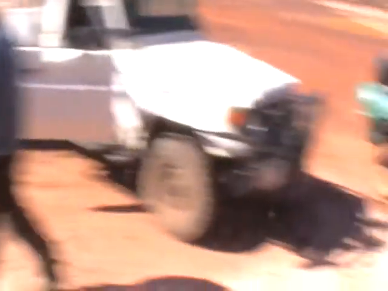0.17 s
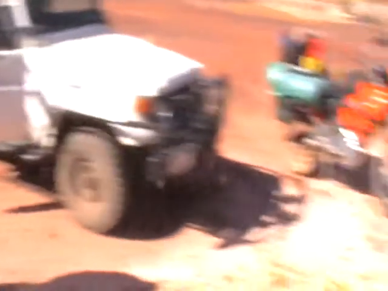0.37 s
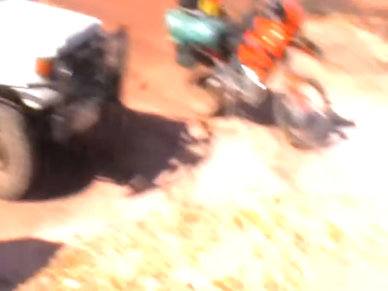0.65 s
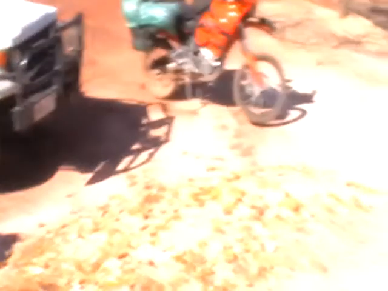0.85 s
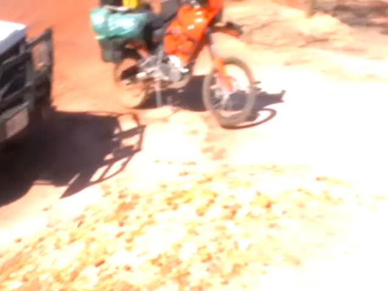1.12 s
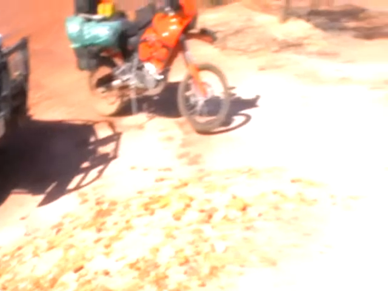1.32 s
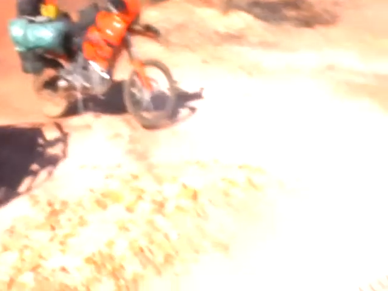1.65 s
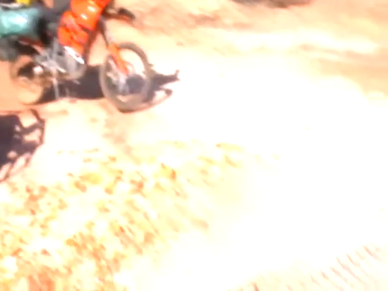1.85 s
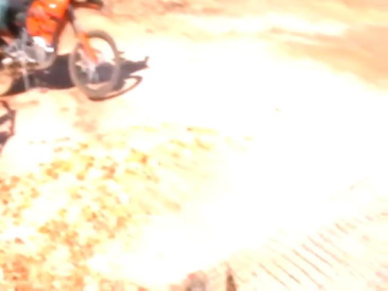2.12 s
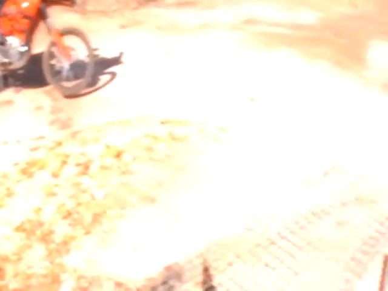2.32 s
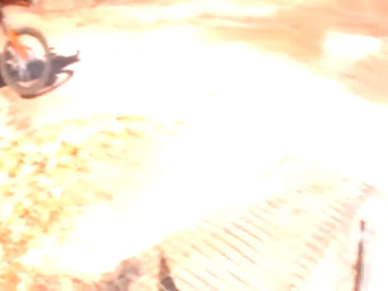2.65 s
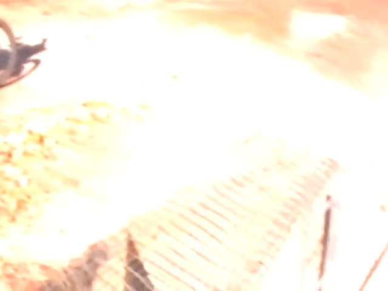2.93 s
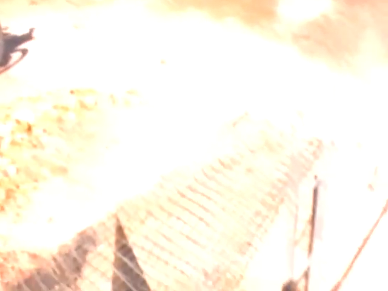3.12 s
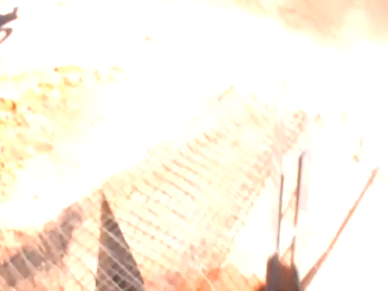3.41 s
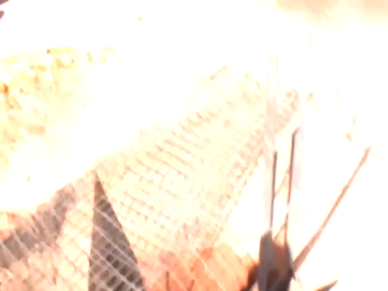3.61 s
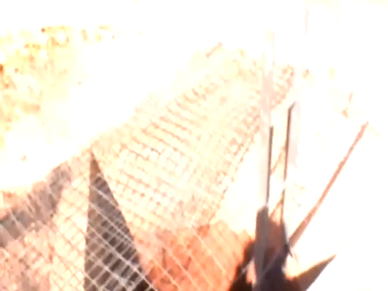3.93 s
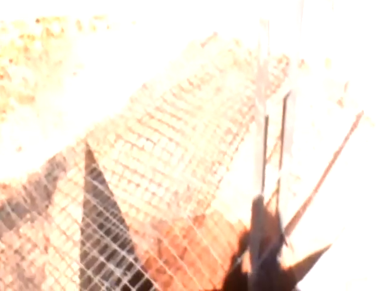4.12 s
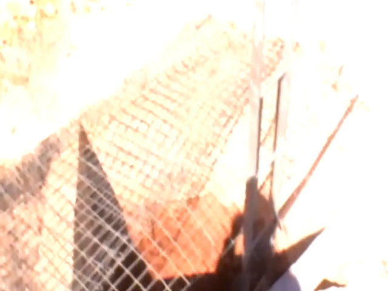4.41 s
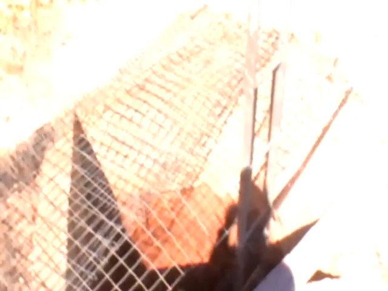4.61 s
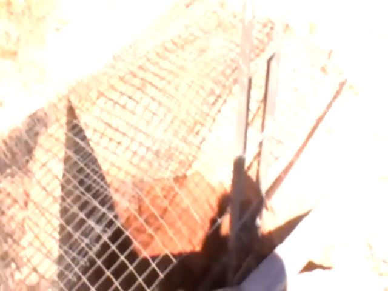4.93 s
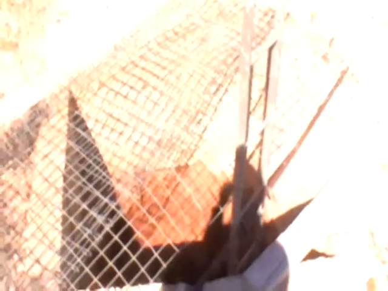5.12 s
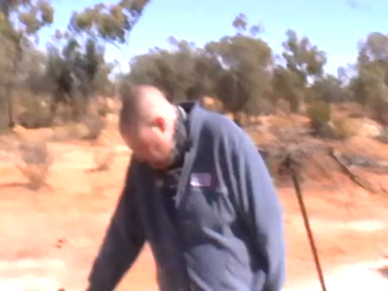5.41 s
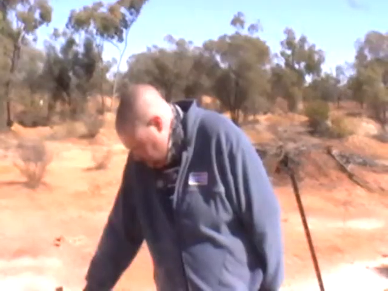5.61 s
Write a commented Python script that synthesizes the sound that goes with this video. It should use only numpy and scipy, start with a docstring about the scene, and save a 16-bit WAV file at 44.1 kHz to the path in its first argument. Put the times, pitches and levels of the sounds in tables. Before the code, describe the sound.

Quiet gritty shuffling and bumps, a clattering failed engine pull, then a second pull that fires into rapid chugging, a brief dropout and a louder run.

```python
"""In a yard outdoors, a small one-cylinder petrol engine is pulled over once and dies, then catches and chugs.
Valve gas is shaped noise, muffler puffs are short low waves; clatter and drone are noise, with a late whine.
Knocks are noise bursts that ring the frame as fading sines, and small steel parts ring higher. Before it, feet
shuffle (gritty noise) and small things tick; soft low bumps come now and then throughout, and a low rumble lies
under it all. Near the end everything falls silent for about a quarter second."""
import sys
import numpy as np
from scipy import signal
from scipy.fft import rfft, irfft, next_fast_len
from scipy.io import wavfile
from scipy.ndimage import uniform_filter1d, map_coordinates

SR = 44100
rng = np.random.default_rng(int(sys.argv[2]) if len(sys.argv) > 2 else 0)


def generate_wav(sig):
    """Save sig (samples, or channels by samples) to the path in sys.argv[1] as 16-bit PCM at SR."""
    pcm = np.round(np.clip(np.atleast_2d(sig).T, -1, 1) * 32767).astype(np.int16)
    wavfile.write(sys.argv[1], SR, pcm)


N = 253575
SIZE = next_fast_len(N + 8192)  # room for filters to ring out
HZ = np.fft.rfftfreq(SIZE, 1 / SR)

# turning of the engine shaft while it chugs: [t/s, turns done]
SHAFT = [(4.071, 0), (4.132, 1), (4.187, 2), (4.291, 4), (4.389, 6), (4.594, 10), (5.007, 18), (5.111, 20),
         (5.218, 22), (5.329, 24), (5.388, 25)]
# tone colour of the knocked frame: [f/Hz, level/dB per Hz]
FRAME_COLOUR = [(260, -23.5), (450, 1.5), (980, -5), (1670, -5), (2100, -15), (3280, -15.5), (5000, -16),
                (8500, -26.5), (16000, -56)]
# tone colour of the muffler drone and of the thud under a knock: [f/Hz, level/dB per Hz]
DRONE_COLOUR = [(120, -47.5), (190, -8.5), (240, 7), (300, 6.5), (410, 2), (520, -8.5), (800, -35)]
# ways the frame rings: [f/Hz, width/Hz, level/dB]
FRAME_MODES = [(240.3, 12, -2.5), (418, 50, -1), (585, 22, -4), (708, 13, -3), (812, 7.4, -3.5),
               (1189.5, 18, -3.5), (1263, 12, -5), (1567, 33, -10), (1699, 50, -7), (2210, 11, -14.5),
               (2727, 41, -10)]


def amp(db):
    """Turns dB into a gain."""
    return 10 ** (np.asarray(db) / 20)


def along(points):
    """Joins (Hz, value) points into a curve on a log frequency axis."""
    hz, value = np.transpose(points)
    return np.interp(np.log(HZ + 1), np.log(hz + 1), value)


def curves(rows):
    """Gives one value per sample for each column after the time."""
    s, *columns = np.transpose(rows)
    return [np.interp(np.arange(N) / SR, s, column) for column in columns]


def wobble(rate):
    """Draws a smooth random curve with this many knots a second."""
    knots = rng.standard_normal(int(N * rate / SR) + 4)
    return map_coordinates(knots, [np.arange(N) * rate / SR])


def filtered(x, response):
    """Multiplies the spectrum of x by a complex response."""
    return irfft(rfft(x, SIZE) * response, SIZE)[..., :N]


def colour(db):
    """Makes a filter of this dB shape that never rings ahead; white noise of rms 1 leaves at rms 1."""
    cepstrum = irfft(np.maximum(db, -120) * np.log(10) / 20, SIZE)
    # folding the second half onto the first gives minimum phase
    cepstrum[1:SIZE // 2] *= 2
    cepstrum[SIZE // 2 + 1:] = 0
    return np.exp(rfft(cepstrum)) / np.sqrt(np.mean(amp(db) ** 2))


def noise(envelope, db):
    """Makes two unrelated noises with one envelope and one colour."""
    return filtered(envelope * rng.standard_normal((2, N)), colour(db))


def add(track, s, piece):
    """Adds a short piece into a track at a time in seconds."""
    k = round(s * SR)
    track[k:k + len(piece)] += piece[:N - k]


def stereo(pair, alike):
    """Mixes two unrelated signals to left and right; where these are alike, the first signal rules."""
    angle = np.arccos(np.clip(along(alike), -1, 1)) / 2
    mid, side = filtered(pair, np.array([np.cos(angle), np.sin(angle)]))
    return np.array([mid + side, mid - side])


def push(hz, cycles, wave=np.cos):
    """A soft push of air: a few cycles under a smooth hump."""
    t = np.arange(int(cycles / hz * SR)) / SR
    hump = np.sin(np.pi * t * hz / cycles) ** 2
    return hump * wave(np.pi * cycles - 2 * np.pi * hz * t)


def lift(peaks):
    """Lift in dB from (Hz, width in Hz, dB) resonances."""
    return sum(db / (1 + (2 * (HZ - hz) / width) ** 2) for hz, width, db in peaks)


def patchy(pair, depth_db, size):
    """Resonances come and go: random gains over time and frequency, with mean squared gain 1."""
    spectrum = signal.stft(pair, nperseg=256)[2]
    field = rng.standard_normal(spectrum.shape[1:])
    field = uniform_filter1d(field, size=size[0], axis=0)
    field = uniform_filter1d(field, size=size[1], axis=1)
    gain = amp(depth_db * field / field.std())
    return signal.istft(spectrum * gain / np.sqrt(np.mean(gain ** 2)), nperseg=256)[1][:, :N]


def turning():
    """While the shaft turns, the casing clatters, loose parts tap the frame, and the muffler drones and rumbles."""
    # three runs (pulled over, chugging, full speed), each: [t/s, casing clatter/dB, muffler drone/dB]
    runs = [
        [(2.05, -64, -71), (2.13, -52.5, -54), (2.28, -66, -49), (2.34, -46, -51), (2.46, -41.5, -41.5),
         (2.57, -40.5, -43), (2.65, -45, -47), (2.78, -45, -53.5), (3.1, -61, -62.5)],
        [(3.47, -61, -65), (3.51, -47.5, -49), (3.58, -49, -41.5), (3.65, -44, -43.5), (3.9, -40, -35.5),
         (4.04, -37.5, -35), (4.2, -36.5, -31.5), (4.37, -35, -38.5), (4.47, -38, -36), (4.6, -37.5, -39.5),
         (5.4, -38.5, -38.5)],
        [(5.62, -35, -36), (5.75, -35.5, -34)],
    ]
    # clatter colour while chugging: [f/Hz, level/dB per Hz]
    chug_colour = [(260, -32), (480, -3), (782, -14.5), (922, -3.5), (1040, -14), (1240, -9), (1600, -10),
                   (2070, -16), (2260, -13), (2790, -13), (3230, -18.5), (6000, -29.5), (8540, -48),
                   (16000, -55)]
    # clatter colour at full speed: [f/Hz, level/dB per Hz]
    racing_colour = [(260, -29.5), (450, 1), (1100, -9), (1260, -7.5), (1730, -12), (2290, -6), (2620, -13),
                     (2830, -9), (3280, -17.5), (11700, -34), (16000, -43)]
    # colour of the low muffler rumble: [f/Hz, level/dB per Hz]
    throb_colour = [(30, -30), (55, 7), (85, 8), (190, 13), (260, -25)]
    # low rumble against the clatter, one value per run: [level/dB]
    throb_levels = [-24, -7, 1]
    # how unevenly the casing rattles, one value per run: [spread/dB]
    rattle_spreads = [2, 2, .8]
    loose_per_s, loose_db = 140, 36.5  # taps of loose parts; level against the clatter
    patch_db = 1.8  # how far the colour shifts from moment to moment

    total, taps = np.zeros((2, N)), np.zeros(N)
    hits = (rng.random(N) < loose_per_s / SR) * rng.standard_normal(N)
    loose = uniform_filter1d(hits, size=5)
    timbres = along(FRAME_COLOUR), along(chug_colour), along(racing_colour)
    for run, timbre, throb_db, spread_db in zip(runs, timbres, throb_levels, rattle_spreads):
        start, end = (run[0][0] - .03, -90, -90), (run[-1][0] + .04, -90, -90)
        clatter_db, drone_db = curves([start] + list(run) + [end])
        rattle_db = spread_db * (wobble(40) + wobble(300))
        total += noise(amp(clatter_db + rattle_db), timbre + casing())
        taps += amp(clatter_db + loose_db) * loose
        total += noise(amp(drone_db + 3.3 * wobble(60)), along(DRONE_COLOUR))
        total += noise(amp(clatter_db + throb_db + 4.5 * wobble(16)), along(throb_colour))
    total[0] += filtered(taps, frame_modes())
    total = patchy(total, patch_db, size=(2, 10))
    total[0] += whine()
    return total


def whine():
    """At full speed a thin tone wavers in level and phase."""
    whine_hz, whine_db, from_s = 2782, -39, 5.5
    t = np.arange(N) / SR
    level = amp(whine_db + 4 * wobble(70))
    return (t > from_s) * level * np.sin(2 * np.pi * whine_hz * t + wobble(70))


def casing():
    """The engine casing resonates and lifts some pitches, in dB."""
    # resonances of the casing: [f/Hz, width/Hz, lift/dB]
    resonances = [(705, 23, 5.5), (815, 25, 5), (1234, 71, 6), (1850, 40, 4.5), (2050, 110, -3),
                  (2235, 70, 3), (2760, 120, 4), (3980, 120, 5), (4350, 440, 2.5)]
    return lift(resonances)


def exhaust():
    """Gas blows when the valve opens, holds, then thins out, the top first; the muffler thumps and puffs."""
    # uneven blows of gas: [t/s, level/dB, top treble against it/dB]
    uneven_hisses = [(2.203, -45.5, -14.5), (2.4562, -36.5, -17), (2.5751, -26, -10.5),
                     (2.664, -44.5, -12.5), (2.8872, -43.5, -21.5), (3.523, -33, -12), (3.6437, -45.5, -25),
                     (3.726, -35.5, -16.5), (3.8327, -17.5, -16.5), (3.905, -35, -40.5),
                     (3.978, -36.5, -10), (4.0002, -37.5, -20), (4.4167, -22.5, -13.5)]
    # single muffler puffs, as it catches and at full speed: [t/s, level/dB]
    single_puffs = [(3.985, -26.5), (4.014, -22.5), (4.056, -19), (5.675, -21.5), (5.712, -21.5)]
    # colour of the gas hiss: [f/Hz, level/dB per Hz]
    gas_colour = [(2000, -7), (2800, 1), (3300, -5), (4200, -5.5), (5500, -6), (6500, -8), (8000, -7.5),
                  (10500, -18.5), (16000, -35)]
    # colour of its top treble: [f/Hz, level/dB per Hz]
    top_colour = [(6000, -21), (9500, 0), (13000, 1), (15000, 0), (16000, -2)]
    # whistles of the exhaust port: [f/Hz, width/Hz, lift/dB]
    port = [(6350, 300, 4), (8550, 150, 5)]
    patch_db = 2  # how far the colour shifts from moment to moment
    hold_s = .018

    flow, top, thump = np.zeros((3, N))
    t = np.arange(SR // 6) / SR
    rise = 1 - np.exp(-t / .002)
    falling = np.maximum(t - hold_s, 0)
    hisses, puffs = chugs()
    for s, db, top_db in uneven_hisses + hisses:
        blow = amp(-60 * falling / 0.07)
        tail = amp(-14.0 - 60 * t / 0.42)
        add(flow, s - .002, rise * amp(db - 7.0) * (blow + tail))
        add(top, s - .002, rise * amp(db + top_db - 1.5 - 60 * falling / 0.068))
        add(thump, s - .003, amp(db - 2) * push(310, cycles=3))
    flutter = amp(0.33 * wobble(350))
    pair = noise(flow * flutter, along(gas_colour) + casing() + lift(port))
    pair += noise(top * flutter, along(top_colour))
    pair = patchy(pair, patch_db, size=(8, 12))
    pair[0] += thump
    for s, db in single_puffs + puffs:
        detune = 1 + .025 * rng.standard_normal()
        add(pair[0], s, amp(db) * push(365 * detune, cycles=2.98, wave=np.sin))
    return pair


def chugs():
    """Each turn gives a hiss and then a puff; a turn without a firing leaks late and weakly."""
    # strength of the firings: [t/s, hiss/dB, puff/dB]
    firing = [(4.07, -30.5, -20.5), (4.21, -35, -18.5), (4.39, -30, -14.5), (4.49, -34.5, -20),
              (4.6, -29.5, -16), (5.0, -32, -17), (5.11, -27.5, -16.5), (5.33, -29.5, -17.5)]
    caught_turns = 6  # every turn blows fully up to here, then every second one
    idle_lag_s, idle_hiss_db, idle_puff_db = 0.017, -20.5, -3.5
    puff_lag_turns, stumble_turn = .23, 7  # puff after the valve opens; one turn has almost no puff
    top_db = -10.5  # top treble against the hiss

    at, done = np.transpose(SHAFT)
    turn = np.arange(done[-1])
    hiss_s = np.interp(turn, done, at)
    puff_s = np.interp(turn + puff_lag_turns, done, at)
    idle = (turn > caught_turns) & (turn % 2 == 1)
    when, *levels = np.transpose(firing)
    hiss_db, puff_db = (np.interp(hiss_s, when, level) for level in levels)
    scatter = rng.standard_normal((len(turn), 2)).T
    hiss_db = hiss_db + idle_hiss_db * idle
    puff_db = puff_db + idle_puff_db * idle - 20 * (turn == stumble_turn) + .7 * scatter[1]
    hisses = zip(hiss_s + idle_lag_s * idle, hiss_db, top_db + 1.5 * scatter[0])
    return list(hisses), list(zip(puff_s, puff_db))


def knocks():
    """A hard blow makes a short rattle with a thud under it; the frame rings on, and steel parts ring too."""
    # knocks of starter and frame: [t/s, level/dB, low thud against it/dB, favoured frame mode f/Hz]
    blow_times = [(2.124, -33.5, -12, 812), (2.209, -33, -4, 585), (2.217, -36.5, 0, 708),
                  (2.306, -33, 2, 413), (2.316, -32.5, -7, 708), (2.387, -29, -2, 1699),
                  (2.397, -31, -12, 1567), (2.435, -30.5, -6, 1699), (2.445, -28.5, -12, 1699),
                  (2.47, -30.5, -10.5, 1699), (2.514, -23, -6, 413), (2.529, -30, -16.5, 1263),
                  (2.575, -22, -6, 1567), (2.582, -25, -9, 1190), (2.644, -36.5, 0.5, 1263),
                  (2.783, -28.5, -21, 1699), (2.798, -32.5, -11.5, 1567), (2.921, -34.5, -17, 1567),
                  (3.154, -35, -25, 1567), (3.257, -32.5, -13.5, 1699), (3.493, -34, -4.5, 812),
                  (3.525, -23, -9, 585), (3.532, -22.5, -4, 585), (3.595, -33, 0, 413),
                  (3.66, -31, -8.5, 708), (3.7, -30, -2, 413), (3.742, -28, -7.5, 1699),
                  (3.775, -31, -2, 708), (3.808, -19, -10, 1567), (3.826, -24, -2, 413),
                  (3.835, -15, -17, 2727), (3.84, -19, -24, 1699), (3.908, -31, -13, 1699),
                  (4.056, -21, -16, 1567), (4.177, -26.5, 11, 1699), (4.409, -12, -12, 413),
                  (4.413, -13, -20, 1699), (4.44, -24, -20, 1190)]
    # ringing of a steel bracket: [f/Hz, level/dB, time to fall 60 dB/s]
    bracket = [(1200, 0, .14), (6290, 3, .3), (6412, 3, .34), (11360, 5, .13)]
    # strikes on the bracket: [t/s, level/dB, dullness/dB per octave]
    clinks = [(2.588, -45, 0), (3.086, -51, 15), (3.272, -44, 15), (4.42, -27, 15)]
    # ringing of a small steel pin: [f/Hz, level/dB, time to fall 60 dB/s]
    pin = [(4470, 0, .32)]
    # strikes on the pin: [t/s, level/dB]
    pings = [(2.079, -58), (2.138, -56), (2.205, -62), (2.582, -55), (4.418, -52)]
    # tiny metal parts of the starter: [t/s, level/dB, f/Hz]
    tinks = [(2.074, -52, 8750), (2.079, -56, 10400), (2.127, -50, 4150), (2.137, -57, 9000),
             (2.208, -51, 5150), (2.209, -56, 9500)]
    tink_t60_s = .06
    knock_t60_s, longer_s_per_db = 0.049, 0.0016  # rattle of a 0 dB knock; weaker ones trail longer
    # frame ring against a knock, per Hz of mode width; lift of the favoured mode; scatter
    ring_db, favour_db, scatter_db = -41, 10, 2.5

    rattle, thud, frame_ring = np.zeros((3, N))
    t = np.arange(SR // 3) / SR
    mode_hz, width, mode_db = np.transpose(FRAME_MODES)[..., None]
    decay = np.exp(-np.pi * width * t)
    onset = 1 - np.exp(-t / .0012)
    modes = width * amp(mode_db) * decay * np.sin(2 * np.pi * mode_hz * t) * onset
    for s, db, thud_db, ring_hz in list(blow_times) + valves():
        t60 = knock_t60_s - longer_s_per_db * db
        fall = amp(db - 60 * t / t60) * (1 - np.exp(-t / 0.0024))
        add(rattle, s - .001, fall)
        add(thud, s - .001, amp(thud_db - 6.5) * fall)
        favoured = np.abs(mode_hz[:, 0] - ring_hz) < 45
        scatter = scatter_db * rng.standard_normal(len(modes))
        add(frame_ring, s, amp(db + ring_db + favour_db * favoured + scatter) @ modes)
    rattle *= amp(2.5 * wobble(180))
    pair = noise(amp(-8.5) * rattle, along(FRAME_COLOUR) + .5 * casing())
    pair += noise(thud, along(DRONE_COLOUR))
    pair += filtered(amp(6) * rattle * rng.standard_normal((2, N)), frame_modes())

    rings = []
    for s, db, dull in clinks:
        for hz, level, t60 in bracket:
            octaves = np.log2(hz / bracket[0][0])
            rings.append((s, db + level - dull * octaves, hz, t60))
    rings += [(s, db + level, hz, t60) for s, db in pings for hz, level, t60 in pin]
    rings += [(s, db, hz, tink_t60_s) for s, db, hz in tinks]
    steel = np.zeros(N)
    for s, db, hz, t60 in rings:
        tone = np.sin(2 * np.pi * (hz * t + rng.random()))
        add(steel, s, amp(db - 60 * t / t60) * tone * (1 - np.exp(-t / 0.0018)))
    pair[0] += frame_ring + steel * amp(1.3 * wobble(250))
    return pair


def valves():
    """The valve gear clacks twice a turn, unevenly in time and level."""
    in_turn, clack_db = [.05, .55], [-32, -36]  # where in a turn, and how hard
    scatter_db, thud_db = 3, -30  # thud is against the clack
    at, done = np.transpose(SHAFT)
    chance = rng.standard_normal((int(done[-1]), 2, 2))
    turn = np.arange(done[-1])[:, None] + in_turn + .05 * chance[..., 0]
    s = np.interp(turn, done, at)
    db = clack_db + scatter_db * chance[..., 1]
    return [(when, level, thud_db, 0) for when, level in zip(s.ravel(), db.ravel())]  # 0: no favoured mode


def frame_modes():
    """The frame rings as a sum of resonators with alternating sign, given as a frequency response."""
    response = 0
    for k, (hz, width, db) in enumerate(FRAME_MODES):
        damping = 1j * HZ * width
        response = response + (-1) ** k * amp(db) * damping / (hz * hz - HZ * HZ + damping)
    return response


def yard():
    """Feet grind on dry ground as gritty noise, with rustle, soft bumps, ticks and a steady low rumble."""
    # feet on dry ground: [t/s, shuffle/dB]
    shuffle = [(0, -58.5), (.3, -55.5), (.5, -56), (.7, -60), (1.05, -62), (1.28, -61.5), (1.44, -57),
               (1.58, -57.5), (1.69, -58), (1.73, -63.5), (1.85, -62.5), (1.94, -65.5), (2.0, -60.5),
               (3.05, -64), (3.44, -64.5)]
    # soles scraping: [t/s, level/dB]
    scuffs = [(.222, -54), (.4, -54), (.572, -58), (.72, -59), (1.455, -56), (1.65, -54.5), (1.68, -55),
              (1.968, -55)]
    # soft bumps: [t/s, level/dB, f/Hz]
    bumps = [(0.318, -36.5, 310), (.401, -35.5, 205), (0.427, -26, 192), (.571, -45.5, 600),
             (.823, -38.5, 375), (1.22, -46.5, 800), (1.459, -41, 850), (1.493, -34.5, 262),
             (1.511, -37, 252), (1.653, -45, 1150), (1.66, -41, 113), (1.663, -43, 1170), (1.765, -39, 152),
             (1.836, -40, 340), (1.877, -35, 124), (1.961, -39.5, 260), (2.021, -36.5, 75),
             (3.594, -28.5, 77.6), (3.66, -37, 71), (3.879, -33, 130), (4.39, -31, 70.4), (5.035, -27, 85),
             (5.667, -29, 84)]
    # dry ticks: [t/s, level/dB, treble against it/dB]
    ticks = [(0.173, -38, -23), (1.004, -48, -11), (1.148, -35, -20), (1.275, -25.5, -24),
             (1.782, -41.5, -34), (2.062, -52.5, -9), (2.1, -41, -10.5)]
    # colour of the rumble: [f/Hz, level/dB per Hz]
    rumble_colour = [(15, -51), (26, -7.5), (59, 5.5), (118, 0), (200, 2), (236, 3), (700, -21.5),
                     (910, -35), (1540, -120)]
    # colour of the shuffling: [f/Hz, level/dB per Hz]
    shuffle_colour = [(240, -26.5), (400, -0.5), (789, -2), (1310, -7), (1520, -5), (1950, -7.5),
                      (2260, -4.5), (2910, -7), (3250, -24.5), (6000, -15.5), (7800, -34), (13200, -120)]
    # colour of the rustle and of the treble of a tick: [f/Hz, level/dB per Hz]
    rustle_colour = [(2060, -34), (3500, -7), (4370, -6.5), (4870, -10.5), (8100, -11.5), (13000, -13),
                     (16000, -19.5)]
    # colour of the body of a tick: [f/Hz, level/dB per Hz]
    snap_colour = [(180, -21), (400, 7), (1300, 6.5), (3000, -0.5), (5000, -19), (16000, -48)]
    # how alike left and right are: [f/Hz, likeness from 0 to 1]
    yard_alike = [(60, 0.96), (180, 0.93), (550, 0.82), (1650, 0.93), (4970, 0.32), (15000, 0.2)]
    rumble_db = -54.5
    rustle_offset_db, rustle_fades_db_per_s = -2.5, 0.3  # against the shuffle
    scuff_t60_s = 0.09
    bump_cycles, bump_ring_s = 1.5, .0065  # a bump lasts this many cycles plus this time

    shuffle_db, = curves(shuffle)
    rustle_db = shuffle_db + rustle_offset_db - rustle_fades_db_per_s * np.arange(N) / SR
    grit_db = 1.1 * wobble(20) + 1.2 * wobble(300)
    pair = noise(amp(rumble_db + 1.4 * wobble(14)), along(rumble_colour))
    scrape, after = amp(shuffle_db), np.arange(SR // 5) / SR
    for s, db in scuffs:
        add(scrape, s, amp(db - 60 * after / scuff_t60_s))
    pair += noise(scrape * amp(grit_db), along(shuffle_colour))
    pair += noise(amp(rustle_db + 0.83 * grit_db), along(rustle_colour))

    snaps, sparks, fronts = np.zeros((3, N))
    t = np.arange(800) / SR
    for s, db, treble_db in ticks:
        add(snaps, s, amp(db - 12 - 60 * t / 0.018))
        add(fronts, s, amp([db + 8.5]))  # a single-sample click
        add(sparks, s, amp(db + treble_db + 10.0 - 60 * t / 0.011))
    pair += noise(snaps, along(snap_colour)) + noise(sparks, along(rustle_colour))
    pair[0] += filtered(fronts, colour(along(snap_colour)))
    for s, db, hz in bumps:
        add(pair[0], s, amp(db) * push(hz, bump_cycles + bump_ring_s * hz))
    return stereo(pair, yard_alike)


def scene():
    """The engine stands to one side, so its level and phase differ between left and right; the yard joins it."""
    # how alike left and right are: [f/Hz, likeness from 0 to 1]
    engine_alike = [(60, .98), (400, .99), (1000, .95), (2400, .97), (5000, .8), (9000, .72), (15000, .62)]
    # balance of the engine: [f/Hz, left minus right/dB]
    balance = [(60, 0.5), (130, 2.5), (290, 1.5), (640, -1.5), (1410, 1), (3100, -1), (5500, 5), (8500, 6),
               (15000, 1.5)]
    # phase by which left leads right: [f/Hz, lead/rad]
    lead = [(100, 0), (1000, .2), (3010, .6), (3450, 1.8), (4220, 1), (5080, 2.1), (6460, 1), (6980, 2.1),
            (7920, 2.5), (8530, 6), (10100, 8.3), (11400, 7.4), (13000, 7.8), (13600, 9.2), (14800, 8.4),
            (16100, 9.3)]
    engine = stereo(turning() + exhaust() + knocks(), engine_alike)
    # each side takes half of the difference
    half = amp(along(balance) / 2) * np.exp(.5j * along(lead))
    return filtered(engine, np.array([half, 1 / half])) + yard()


def record(dry):
    """The microphone loses the deepest bass and rings in its housing; a silent gap and a top limit follow."""
    # resonances of the microphone housing: [f/Hz, width/Hz, lift/dB]
    housing = [(1678, 337, 4.5), (2288, 180, 6), (2870, 120, 5)]
    # the silent gap: [t/s, level/dB]
    gap = [(5.362, 0), (5.366, -32), (5.388, -52), (5.395, -140), (5.632, -140), (5.635, -30), (5.64, 0)]
    bass_hz, top_hz = 35, 15850
    microphone = (1j * HZ / (bass_hz + 1j * HZ)) ** 2 * amp(lift(housing))
    heard = filtered(dry, microphone) * amp(curves(gap)[0])
    return filtered(heard, HZ < top_hz)


dry = scene()
out = record(dry)
generate_wav(out)
```